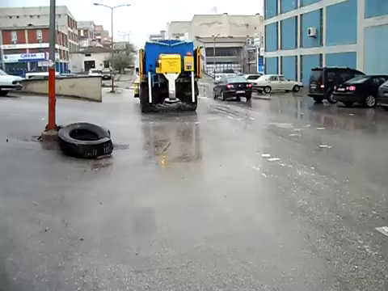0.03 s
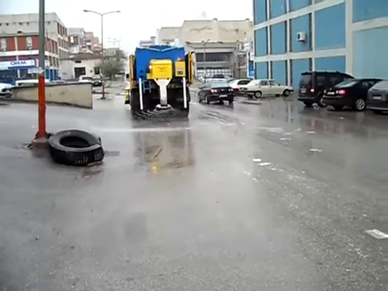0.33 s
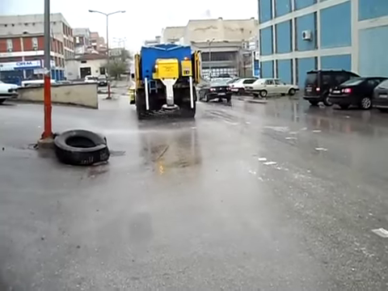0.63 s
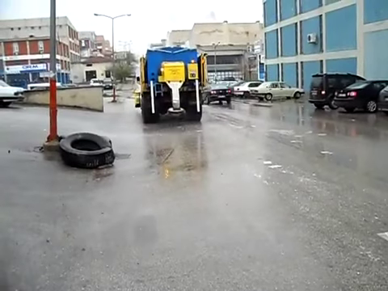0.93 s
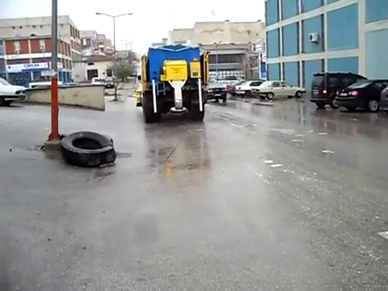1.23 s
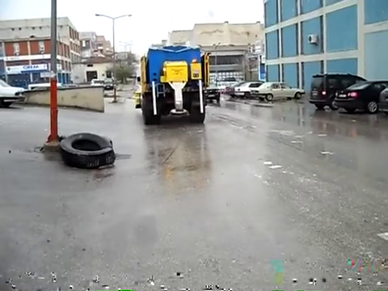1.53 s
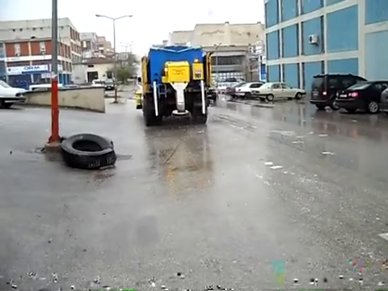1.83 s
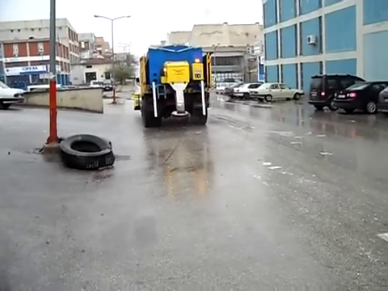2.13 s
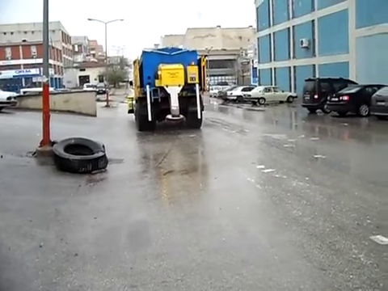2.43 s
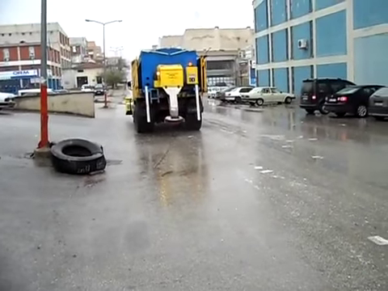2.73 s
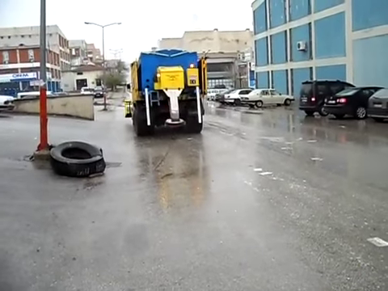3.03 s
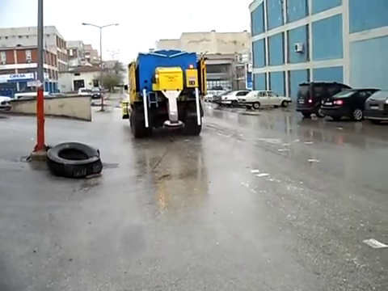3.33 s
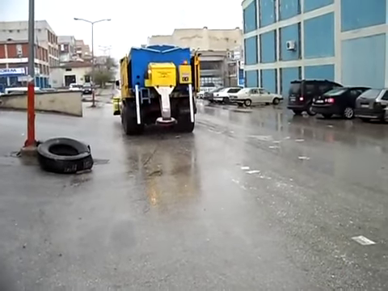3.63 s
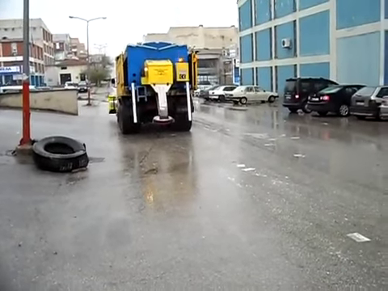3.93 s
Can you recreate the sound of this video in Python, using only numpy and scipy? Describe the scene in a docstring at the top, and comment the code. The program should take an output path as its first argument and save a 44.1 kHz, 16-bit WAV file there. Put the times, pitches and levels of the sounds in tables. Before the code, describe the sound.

Rhythmic swishes of salt fly from a truck's spinning spreader, each batch drumming on steel and fading as a hiss. The machinery drones and clatters over a low engine rumble, and occasional grains tick faintly on the pavement close by.

```python
"""Salt drops on a spreader truck's spinning disc, one batch about every 0.7 s.
Each batch drums on the steel chute and flies out as a swish of grain impacts that darkens as it thins.
A few stray grains tick on the pavement close by. Underneath, the spreader drive drones and clatters
at a nearly constant rate while the truck's engine slowly gathers speed."""
import sys
import numpy as np
from scipy import signal
from scipy.fft import rfft, irfft, next_fast_len
from scipy.io import wavfile
from scipy.ndimage import map_coordinates

SR = 44100
rng = np.random.default_rng(int(sys.argv[2]) if len(sys.argv) > 2 else 0)


def generate_wav(sig):
    """Save sig (samples, or channels by samples) to the path in sys.argv[1] as 16-bit PCM at SR."""
    pcm = np.round(np.clip(np.atleast_2d(sig).T, -1, 1) * 32767).astype(np.int16)
    wavfile.write(sys.argv[1], SR, pcm)


N = 176400

# engine speed and strength: time_s, firing_hz, fundamental_db, overtones_db
ENGINE_RUN = [(.26, 28.44, -41, -46.5), (.95, 26.52, -37.5, -43), (1.5, 29.33, -33.5, -48),
              (2.0, 31.2, -31, -41.5), (2.5, 33.86, -41, -40), (3.0, 35.72, -32, -46),
              (3.55, 37.5, -37.5, -39), (4.0, 37.88, -38, -45)]
# exhaust overtones: firing_multiple, gain_db
ENGINE_ORDERS = [(2, 2.5), (3, -19), (4, -10.5), (5, -21.5)]
# engine rumble: frequency_hz, density_db
RUMBLE_SPECTRUM = [(15, -3), (28, -1.5), (48, 4), (90, 1.5), (160, -4), (230, -13), (500, -14.5),
                   (2000, -54)]
# spreader drive speed and strength: time_s, shaft_hz, firing_tone_db, overtones_db
DRIVE_RUN = [(.26, 28.7, -26, -39.5), (.75, 28.91, -30, -44), (1.2, 28.72, -28, -50.5),
             (1.65, 28.64, -26.5, -42), (2.1, 28.6, -30, -40), (2.8, 28.53, -32, -39.5),
             (3.3, 28.56, -35, -38), (4.0, 28.5, -35.5, -38)]
# drive overtones: shaft_multiple, gain_db
SHAFT_ORDERS = [(3, 0.5), (4, -7), (5, -12.5), (6, -13.5)]
# drive clatter: frequency_hz, density_db
CLATTER_SPECTRUM = [(100, -12), (250, 0.5), (400, -2), (720, 2.5), (920, -9.5), (1600, -10), (2300, -14),
                    (3600, -19.5), (5500, -29.5), (7000, -30), (10000, -38.5), (13500, -42.5)]
# strength of the clatter: time_s, level_db
CLATTER_ENVELOPE = [(.25, -32.5), (.6, -37), (1.03, -38.5), (1.4, -36.5), (1.7, -37), (2.1, -32.5),
                    (2.45, -37), (2.9, -35), (3.6, -33), (4.0, -38.5)]
# stray grains landing: start_s, relative_peak_db
LANDINGS = [(0.386, -34), (.452, -40), (.809, -44), (.842, -47), (.939, -43), (1.023, -50), (1.094, -40),
            (1.6692, -38), (1.6878, -33.5), (1.7351, -43), (1.7668, -29), (2.1712, -41), (2.2345, -35),
            (2.243, -43), (2.266, -42), (2.9812, -39), (3.092, -41), (3.256, -35)]
# a grain striking pavement: frequency_hz, density_db
TICK_SPECTRUM = [(3000, -37), (5700, -11), (6400, -1.5), (7250, -1.5), (7900, -7), (8400, -5.5),
                 (10000, -23), (13500, -12.5)]
# batches of salt: start_s, drum_gain_db, spray_gain_db, duration_ratio, spray_tilt_db_per_octave
SALT_BATCHES = [(0.373, -0.5, 0, 0.95, 1.5), (1.08, 0, -1.86, 1.13, -1.1), (1.77, 0, -1, 0.99, 0.2),
                (2.471, 1, -1.5, 1.07, 0), (3.13, 0.55, -1.9, 1.09, 0), (3.775, 1.5, -1, 1.05, 0.5)]
# resonances of the steel chute: frequency_hz, bandwidth_hz, gain_db
CHUTE_MODES = [(286, 36, -7), (369.2, 15, 2.5), (411, 33, -3), (458, 14.7, 0), (505.7, 18, 2),
               (611, 20.3, 1.5), (656.6, 15, 2.5), (744, 77, -4.5), (1206, 12, -16), (1237, 10, -17)]
# thud of salt on steel: frequency_hz, density_db
THUD_SPECTRUM = [(100, -29), (180, -10), (330, 0), (600, 0.5), (770, -1), (900, -9.5), (1300, -19.5),
                 (1800, -22), (4000, -74.5)]
# spray of grains: frequency_hz, density_db
SPRAY_SPECTRUM = [(500, -4.5), (1000, -2), (1350, -4), (1720, -5.5), (2050, 2.5), (3100, -2), (4300, -8),
                  (5900, -16), (7500, -24.5), (10000, -32), (13500, -36)]
# microphone response: frequency_hz, gain_db
MIC_RESPONSE = [(10000, 0), (10550, -5), (10950, -19), (11600, -9), (12200, -9), (13000, -15), (13700, -24)]


def amp(db):
    """Decibels to amplitude ratio."""
    return 10 ** (np.asarray(db) / 20)


def unit(x):
    """Normalisation to rms 1."""
    return x / np.sqrt(np.mean(x ** 2) + 1e-20)


def clock():
    """Sample times in seconds."""
    return np.arange(N) / SR


def curves(rows):
    """Linear interpolation of each column over time."""
    times, *columns = np.transpose(rows)
    return [np.interp(clock(), times, column) for column in columns]


def wobble(knots_per_s):
    """Slow random modulation: a spline through Gaussian values."""
    return map_coordinates(rng.standard_normal(2048), [clock() * knots_per_s], mode="wrap")


def filtered(x, response):
    """Linear filtering: the spectrum times a frequency response."""
    size = next_fast_len(N + SR // 2)
    return irfft(rfft(x, size) * response(np.fft.rfftfreq(size, 1 / SR)), size)[:N]


def coloured(x, spectrum):
    """Spectral shaping on a log-frequency axis, at rms 1."""
    knots_hz, db = np.transpose(spectrum)
    return unit(filtered(x, lambda hz: amp(np.interp(np.log(hz + 1), np.log(knots_hz), db))))


def impacts(per_s, spread_db):
    """Shot noise: independent impulses of log-normal size."""
    hits = rng.random(N) < per_s / SR
    return unit(hits * np.sign(rng.standard_normal(N)) * amp(spread_db * rng.standard_normal(N)))


def harmonics(cycles, orders, waver_db):
    """Periodic motion sounds at whole multiples of its rate; each wavers in level."""
    return np.sqrt(2) * sum(
        amp(db + waver_db * wobble(8.3)) * np.sin(2 * np.pi * (order * cycles + rng.random()))
        for order, db in orders)


def truck_engine():
    """Periodic firing gives a harmonic exhaust tone that rises with speed, over a low rumble."""
    firing_hz, fundamental_db, overtones_db = curves(ENGINE_RUN)
    cycles = np.cumsum(firing_hz) / SR
    fundamental = amp(fundamental_db) * harmonics(cycles, [(1, 0)], waver_db=2.5)
    overtones = amp(overtones_db) * harmonics(cycles, ENGINE_ORDERS, waver_db=4.0)
    rumble = amp(-40.5) * coloured(rng.standard_normal(N), RUMBLE_SPECTRUM)
    return fundamental + overtones + rumble


def spreader_drive(hum_hz=152.6):
    """Shaft harmonics drone over a faint hum; two firings a turn amplitude-modulate the clatter."""
    shaft_hz, firing_db, overtones_db = curves(DRIVE_RUN)
    turns = np.cumsum(shaft_hz) / SR
    firing = amp(firing_db) * harmonics(turns, [(2, 0)], waver_db=0.2)
    overtones = amp(overtones_db) * harmonics(turns, SHAFT_ORDERS, waver_db=3.1)
    hum = amp(-48.5) * harmonics(hum_hz * clock(), [(1, 0)], waver_db=2.0)
    accent = 0.32 * np.cos(np.pi * turns)  # once every two turns
    pulses = np.exp(0.165 * (np.cos(4 * np.pi * turns) + accent))
    clatter_db, = curves(CLATTER_ENVELOPE)
    clatter = amp(clatter_db) * coloured(pulses * rng.standard_normal(N), CLATTER_SPECTRUM)
    return firing + overtones + hum + clatter


def stray_grains(t60_s=0.024):
    """Brief contact excites high frequencies: each landing is a bright, exponentially decaying tick."""
    t = clock()
    envelope = sum((t >= start) * amp(db - 60 * np.abs(t - start) / t60_s) for start, db in LANDINGS)
    return amp(-5) * envelope * coloured(rng.standard_normal(N), TICK_SPECTRUM)


def salt_flow(t, gain_column, rise_s, hold_s, fall_db_per_s, rise_power, octaves=0):
    """Incoherent batches add in power; each swells, holds and decays on its own stretched time scale."""
    power = 0
    for batch in SALT_BATCHES:
        start_s, _, _, duration_ratio, tilt = batch
        age = np.maximum(t - start_s, 0) / duration_ratio
        rise = np.minimum(age / rise_s, 1) ** rise_power
        decay_db = fall_db_per_s * np.maximum(age - rise_s - hold_s, 0)
        power = power + (rise * amp(batch[gain_column] + tilt * octaves - decay_db)) ** 2
    return np.sqrt(power)


def chute_response(hz):
    """Modal superposition: damped resonances of the steel add with alternating sign."""
    return sum((-1) ** k * amp(db) * 1j * hz * width / (mode_hz ** 2 - hz ** 2 + 1j * hz * width)
               for k, (mode_hz, width, db) in enumerate(CHUTE_MODES))


def chute_drumming():
    """Impact excitation: falling salt thuds on the disc and sets the chute's modes ringing."""
    ring = unit(filtered(impacts(per_s=2000, spread_db=2), chute_response))
    thud = coloured(impacts(per_s=3000, spread_db=2), THUD_SPECTRUM)
    swell = salt_flow(clock(), gain_column=1, rise_s=0.11, hold_s=0.026,
                      fall_db_per_s=22.5, rise_power=0.58)
    return amp(-27 + 0.32 * wobble(27.88)) * swell * unit(thud + amp(1) * ring)


def steel_body(x, t60_s=0.16):
    """Reverberation: the dense modes of the truck's body add a short, decaying tail."""
    t = np.arange(SR // 8) / SR
    tail = rng.standard_normal(len(t)) * amp(-60 * t / t60_s)
    return x + amp(-9) * signal.fftconvolve(x, tail / np.linalg.norm(tail))[:N]


def salt_spray(reference_hz=2940):
    """Dense impacts merge into a hiss that darkens as the flung grains slow and shower down."""
    grains = coloured(steel_body(impacts(per_s=6000, spread_db=1.0)), SPRAY_SPECTRUM)
    hz, t, bands = signal.stft(grains, SR, nperseg=256)
    ratio = np.clip(hz, 800, 7000)[:, None] / reference_hz
    stretch = ratio ** -0.42  # higher bands peak sooner
    fall_db_per_s = 35 * ratio ** 0.55  # and die faster
    swell = salt_flow(t, gain_column=2, rise_s=0.11 * stretch, hold_s=0.063 * stretch,
                      fall_db_per_s=fall_db_per_s, rise_power=0.43, octaves=np.log2(ratio))
    _, swish = signal.istft(bands * swell, SR, nperseg=256)
    return amp(-32 + 0.89 * wobble(30)) * swish[:N]


def scene():
    """Superposition: the pressures of all sources add in one channel."""
    return (truck_engine() + spreader_drive() + stray_grains() + chute_drumming() + salt_spray())[None]


def record(dry):
    """Band limiting: the microphone dulls the top of the sound; the first quarter second is silent."""
    start_s, cutoff_hz = 0.2445, 13700
    response = lambda hz: amp(np.interp(hz, *np.transpose(MIC_RESPONSE))) * (hz < cutoff_hz)
    return filtered(dry[0] * (clock() >= start_s), response)[None]


dry = scene()
out = record(dry)
generate_wav(out)
```